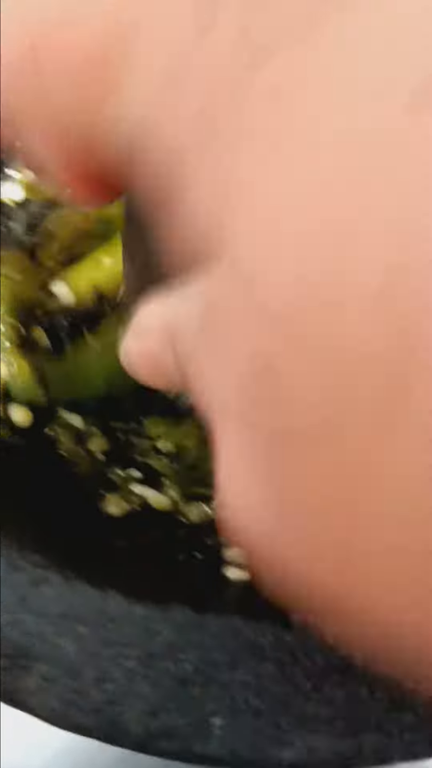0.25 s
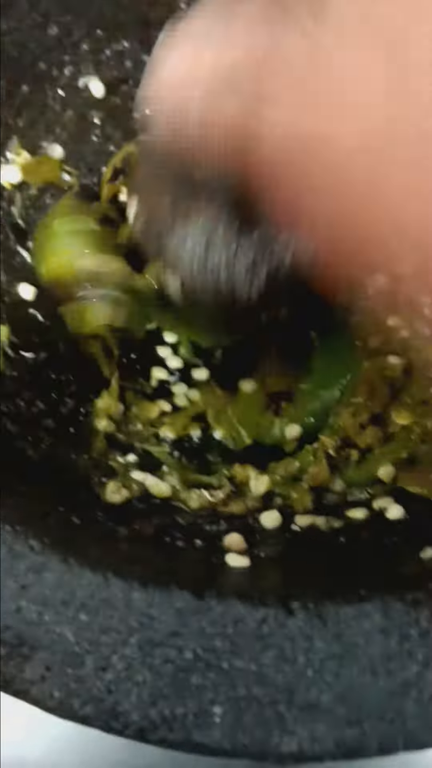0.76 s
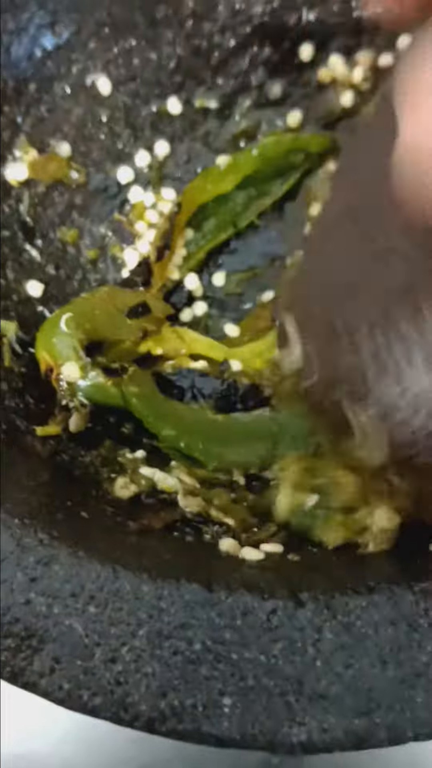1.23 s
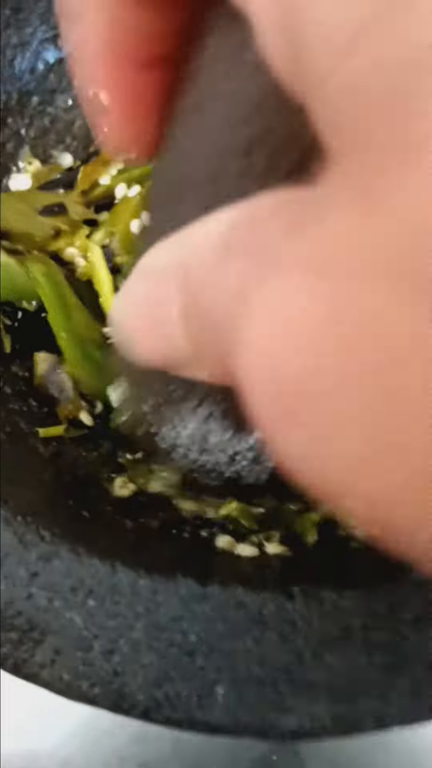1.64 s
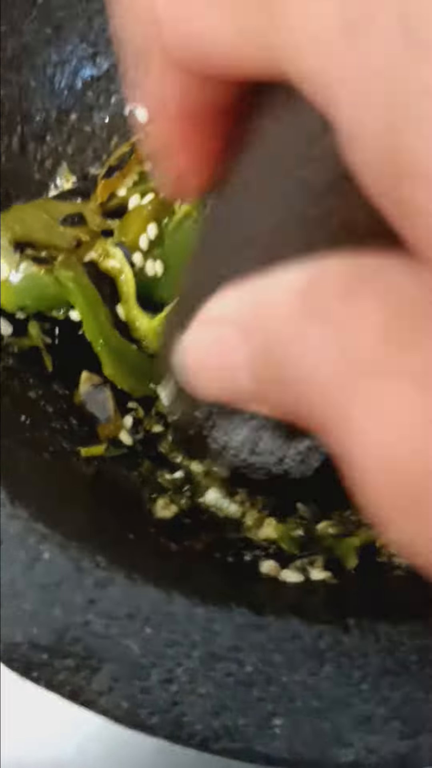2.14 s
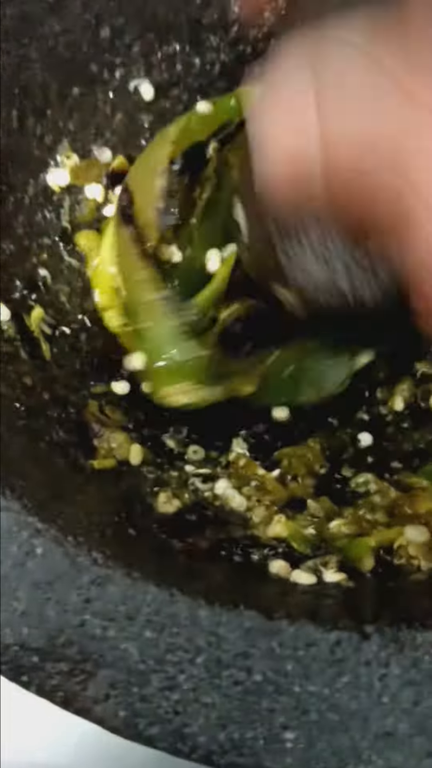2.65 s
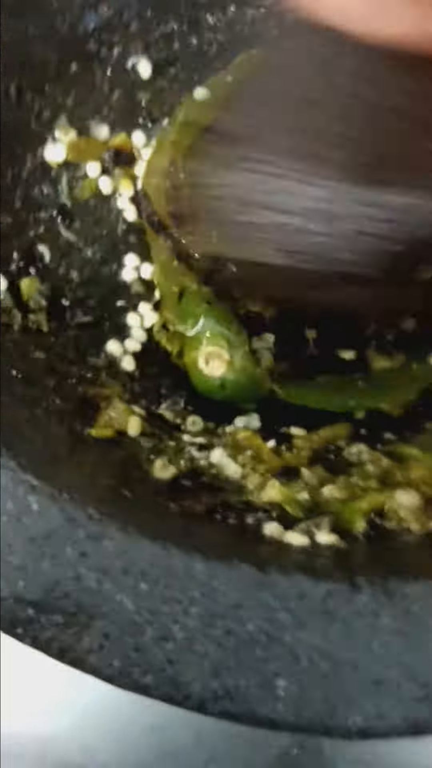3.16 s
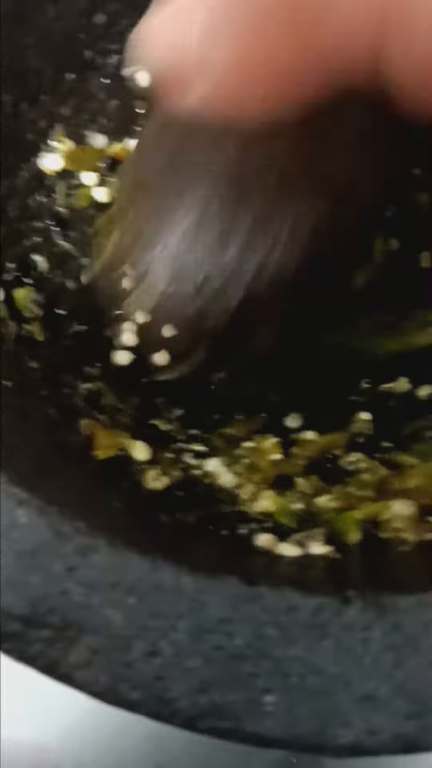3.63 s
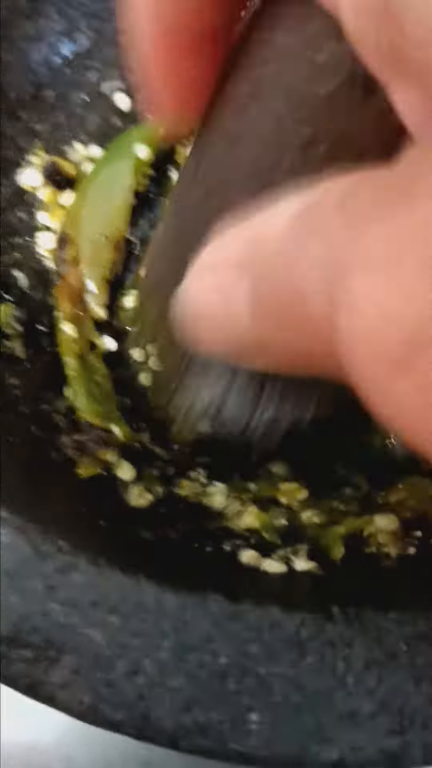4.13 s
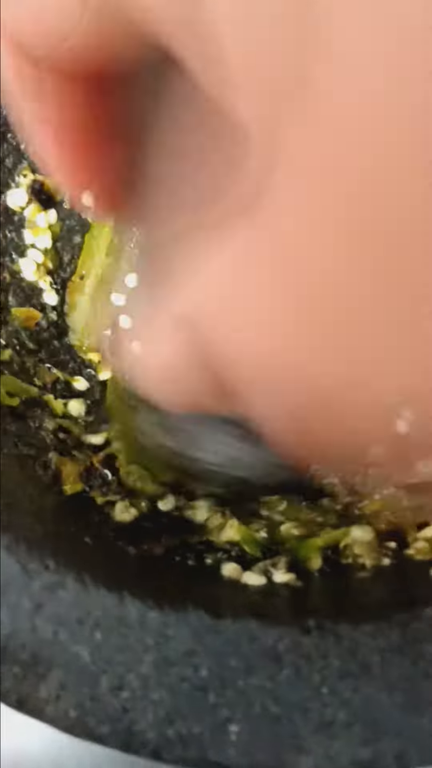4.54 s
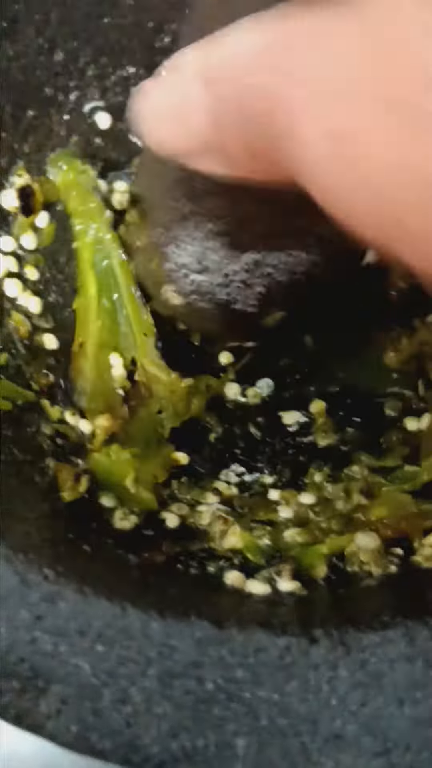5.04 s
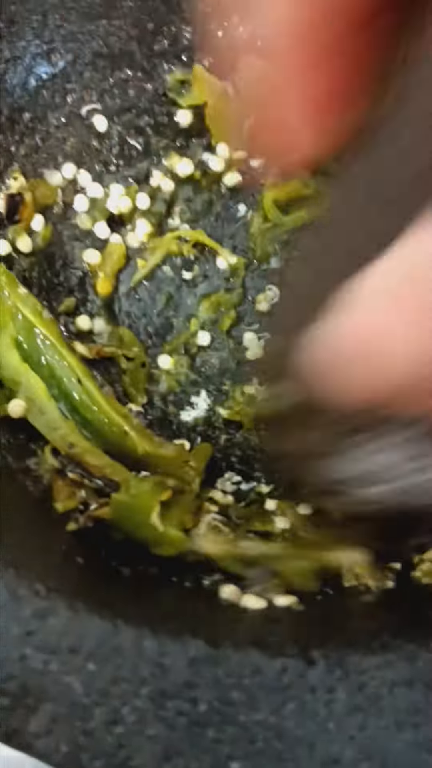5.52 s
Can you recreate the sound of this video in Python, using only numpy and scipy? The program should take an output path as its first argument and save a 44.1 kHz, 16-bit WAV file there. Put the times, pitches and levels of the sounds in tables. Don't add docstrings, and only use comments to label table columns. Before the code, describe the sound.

A stone pestle crushes green chiles in a stone mortar, with crackling seeds, gritty strokes, dull knocks and a few hard stone clacks, heard very close.

```python
import sys
import numpy as np
from scipy import signal
from scipy.fft import rfft, irfft, next_fast_len
from scipy.io import wavfile
from scipy.ndimage import uniform_filter1d

SR = 44100
rng = np.random.default_rng(int(sys.argv[2]) if len(sys.argv) > 2 else 0)


def voltage_ratio(level):
    return 10 ** (np.asarray(level, float) / 20)


def put_to_file(sound):
    columns = np.atleast_2d(sound).T
    safe = np.clip(columns, -1, 1)
    whole_steps = np.round(safe * 32767)
    wavfile.write(sys.argv[1], SR, whole_steps.astype(np.int16))


N = 254867
HZ = np.fft.rfftfreq(next_fast_len(N + 8192), 1 / SR)

# (pitch [Hz], level [dB])
WALL = [(610, 20), (715, 21.5), (950, 21.5), (1190, 12.5), (1400, 16), (1580, 7), (1780, -12), (2100, 6),
        (2400, 10.5)]
WALL_WIDTH_HZ = 110
# (pitch [Hz], level [dB])
FINE = [(1500, -87.5), (3000, -10.5), (4500, 1.5), (7000, 3.5), (11000, 5.5), (16500, -1.5)]


def evened(x):
    return x / np.sqrt(np.mean(x ** 2) + 1e-20)


def read(points, hz):
    f, value = np.transpose(points)
    return np.interp(np.log(hz + 1), np.log(f + 1), value)


def colour(x, points):
    size = 2 * (len(HZ) - 1)
    return irfft(rfft(x, size) * voltage_ratio(read(points, HZ)), size)[..., :N]


def add(mix, s, sound):
    part = mix[..., round(s * SR):][..., :sound.shape[-1]]
    part += sound[..., :part.shape[-1]]


def resonate(x, hz, width):
    hz = min(hz, SR / 2.2)
    return signal.lfilter(*signal.iirpeak(hz, hz / width, SR), x)


def mode(hz, t60, rise=0.00032, count=22050):
    t = np.arange(count) / SR
    fade = voltage_ratio(-60 * t / t60)
    return fade * (1 - np.exp(-t / rise)) * np.sin(2 * np.pi * hz * t)


def pair(shared, own):
    # (pitch [Hz], left-right likeness [0 to 1])
    likeness = [(200, 0.33), (600, 0.09), (1500, 0.21), (4000, 0.11), (15000, 0.043)]
    size = 2 * (len(HZ) - 1)
    same = np.clip(read(likeness, HZ), 0, 1)
    both = np.sqrt(same) * rfft(shared, size) + np.sqrt(1 - same) * rfft(own, size)
    return irfft(both, size)[:, :N]


def stroke(order):
    # (landing [s], lifting [s], counter rumble [dB], stone scrape [dB], grit rubbing [dB])
    hand_moves = [(0.0, -0.011, -21, -22, -42.5), (0.089, 0.065, -38, -33.5, -62),
                  (0.316, 0.29, -18, -14.5, -41), (0.665, 0.77, -43, -70.5, -61.5),
                  (1.015, 1.121, -37.5, -54, -48.5), (1.289, 1.37, -37.5, -47, -75),
                  (1.404, 1.512, -35, -39.5, -47.5), (1.522, 1.584, -34.5, -42.5, -62),
                  (1.687, 1.74, -29, -52, -64.5), (1.931, 1.954, -34, -36.5, -58),
                  (2.164, 2.205, -20, -28.5, -45.5), (2.275, 2.41, -37, -49, -56.5),
                  (2.566, 2.696, -25, -32.5, -60.5), (3.005, 3.076, -28.5, -38, -44.5),
                  (3.33, 3.482, -37, -54, -48.5), (3.51, 3.74, -37.5, -52, -51.5),
                  (3.798, 3.986, -30.5, -39.5, -51.5), (4.152, 4.266, -25, -31, -49),
                  (4.358, 4.495, -31.5, -34, -48.5), (4.56, 4.88, -32.5, -49.5, -47),
                  (4.93, 5.03, -32.5, -46, -75.5), (5.26, 5.46, -27.5, -36.5, -49.5),
                  (5.538, 5.548, -28.5, -26, -47), (5.611, 5.777, -34.5, -42.5, -47.5)]
    landing_db_per_s = (1301.5, 2497.5, 510)[order]
    lifting_db_per_s = (153, 236, 62)[order]
    rest_db = (-60, -65.5, -86.5)[order]
    t = np.arange(0, N + 64, 64) / SR
    power = voltage_ratio(2 * rest_db)
    for land, lift, *levels_db in hand_moves:
        early_db = landing_db_per_s * np.maximum(land - t, 0)
        late_db = lifting_db_per_s * np.maximum(t - lift, 0)
        power = power + voltage_ratio(2 * (levels_db[order] - (early_db + late_db)))
    return np.interp(np.arange(N) / SR, t, np.sqrt(power))


def crackle(per_s, spread_db, smear, bed):
    size_db = spread_db * np.minimum(rng.exponential(1, N), 3.8)
    fractures = voltage_ratio(size_db) * (rng.random(N) < per_s / SR)
    smeared = signal.lfilter([1], [1, -np.exp(-1 / (smear * SR))], fractures)
    noise = rng.standard_normal((3, N)) * (bed + evened(smeared))
    return pair(noise[0], noise[1:])


def patchy(x, depth_db):
    hz, t, z = signal.stft(x, SR, nperseg=256)
    field = uniform_filter1d(rng.standard_normal(z.shape[1:]), size=12, axis=0)
    field = evened(uniform_filter1d(field, size=8, axis=1))
    return signal.istft(z * voltage_ratio(depth_db * field), SR, nperseg=256)[1][:, :N]


def crushing():
    # (time [s], fine grit [dB], coarse grit against fine [dB], length [ms])
    skin_presses = [(0.344, -26, -19.5, 6.7), (3.2, -45, 4, 40), (1.064, -34, 4, 5.1), (1.127, -35, 6, 48),
                    (1.425, -34, -34.5, 31), (1.447, -26, -7.5, 27), (1.551, -31.5, -7, 26),
                    (1.6, -29.5, -19.5, 37), (1.728, -26, -25, 34), (1.844, -32.5, -24.5, 58),
                    (2.212, -24, 0, 9.8), (3.364, -25.5, -8, 33.6), (3.447, -32, -22.5, 44),
                    (3.951, -34, -10, 41), (4.033, -34, -44, 35), (4.241, -27, -20, 14),
                    (2.675, -22, -6, 22), (4.589, -24.5, -5, 1.3), (4.717, -38, 4.5, 64),
                    (4.979, -26.5, 0, 20), (5.549, -27.5, -14, 55), (5.621, -31, 4, 11),
                    (5.711, -33.5, -2, 25), (5.604, -31.5, -15, 9.2)]
    # (time [s], fine grit [dB], coarse grit against fine [dB], length [ms])
    seed_crushes = [(0.286, -26.5, 4.5, 12), (0.431, -52, 9.5, 60), (0.661, -35, -1, 31),
                    (0.744, -37.5, -9.5, 27), (1.314, -28, -24.5, 9), (1.637, -33, -15.5, 20),
                    (1.869, -29, -44.5, 7.2), (1.947, -30.5, -12.5, 25), (2.147, -19, -10, 5.2),
                    (2.175, -29.5, 2, 6.8), (2.336, -33, -1.5, 26), (2.365, -33, 7, 3.7),
                    (2.655, -25, 0, 27.7), (3.057, -29.5, 2, 42.4), (3.576, -31, 0, 75),
                    (3.751, -27.5, -10.5, 50), (3.905, -29.5, -4, 25), (4.277, -29.5, 6.5, 5.3),
                    (4.537, -31, -12, 20), (4.613, -31, -4.5, 26), (4.678, -29, -21, 10),
                    (4.821, -36, -5, 38), (5.459, -32.5, -9, 19)]
    # (time [s], fine grit [dB], coarse grit against fine [dB], length [ms])
    pulp_smears = [(0.073, -36, -8, 36), (0.317, -47, 13, 4.9), (0.693, -33, -16.5, 28),
                   (0.979, -33.5, -11, 24), (1.011, -45.5, -6.5, 190), (1.181, -35, -20, 17),
                   (1.265, -29, -9.5, 66), (1.917, -26, -26.5, 5.3), (2.415, -35, -12, 45),
                   (2.76, -41, 0, 130), (2.797, -42, 2, 6), (0.47, -44, 0, 130), (0.78, -46, -6, 120),
                   (5.04, -35, -20, 3), (5.049, -34, -20, 3), (5.075, -34, -20, 3), (2.5435, -22, 4, 9.1),
                   (2.582, -34.5, -8.5, 120), (2.738, -34, -30, 32), (2.971, -28.5, -41, 4.9),
                   (3.328, -38, -4, 21), (3.408, -48, -6, 23), (3.541, -30, -43, 15),
                   (3.869, -29.5, -17, 40), (4.1465, -25, -25.5, 9), (4.17, -35, -20, 70),
                   (1.79, -37, -25, 70), (1.96, -38, -20, 80), (5.375, -38, -8, 80), (3.1, -41, -4, 90),
                   (4.407, -28, -2.5, 37), (4.473, -39, -6, 75), (4.847, -31, -11.5, 16),
                   (5.063, -33.5, -15.5, 26), (5.2065, -33, -5, 8), (4.162, -28, -20, 14),
                   (4.222, -35, -20, 8), (4.908, -36, -5, 12), (5.035, -38, -5, 15), (0.54, -52, 6, 20),
                   (2.618, -30, -15, 12), (1.245, -42, 3, 10), (5.328, -30, -2.5, 57)]
    power = (stroke(order=2) * voltage_ratio([[11.], [-4.]])) ** 2
    padded = np.pad(power, ((0, 0), (4000, 6000)))
    ms = np.arange(-4000, 6000) * 1000 / SR
    bend = np.where(ms < 0, 2.2, 1.3)
    for bursts, swell in ((skin_presses, 0.84), (seed_crushes, 0.47), (pulp_smears, 0.25)):
        for s, db, coarse_db, length_ms in bursts:
            swell_ms = max(swell * length_ms, .7)
            fade_ms = max((1 - swell) * length_ms, .7)
            slope = np.where(ms < 0, -ms / swell_ms, ms / fade_ms)
            shape = voltage_ratio(-7. * slope ** bend)
            add(padded, s, voltage_ratio([[db], [db + coarse_db]]) ** 2 * shape ** 2)
    return np.sqrt(padded[:, 4000:4000 + N])


def grit():
    # (pitch [Hz], level [dB])
    coarse_colour = [(500, -30), (1000, -13.5), (2000, -5.5), (3400, -1), (5000, -9.5), (8000, -8)]
    fine = evened(patchy(colour(crackle(1300., 3.4, .0005, .7), FINE), 1.4))
    coarse = evened(patchy(colour(crackle(300., 3.5, .0015, .6), coarse_colour), 2.8))
    fine_gain, coarse_gain = crushing()
    return voltage_ratio(3.0) * fine_gain * fine + voltage_ratio(3.82) * coarse_gain * coarse


def snaps():
    # (time [s], peak level [dB])
    seed_cracks = [(0.2845, -7), (0.3405, -3.5), (0.0218, -18), (0.404, -26), (0.43, -25), (0.509, -26),
                   (0.531, -28), (0.551, -26), (0.9737, -22), (1.05, -24), (1.1255, -14), (1.1785, -20),
                   (1.2648, -13), (1.298, -13), (0.656, -10), (0.694, -13.5), (1.0653, -10), (1.3148, -4),
                   (1.4222, -4.5), (1.4415, -7), (1.4472, -5), (1.712, -16), (1.9145, -18), (1.943, -12),
                   (2.127, -18), (2.3503, -7), (2.617, -13), (2.661, -8), (3.033, -12), (3.319, -16),
                   (3.344, -13), (3.7375, -14), (1.6903, -4), (1.786, -20), (1.803, -22), (1.728, -12),
                   (2.1986, -11.5), (2.2084, -1), (2.362, -4), (2.5442, -23), (3.3642, -7), (3.5407, -8),
                   (4.2396, -11), (4.586, -12.5), (4.1615, -12), (4.2205, -16), (4.273, -13), (4.4005, -14),
                   (4.5725, -21), (4.6505, -16), (4.661, -15), (4.7143, -12), (4.8165, -17), (4.8467, -15),
                   (4.9073, -22), (4.9562, -15), (5.454, -17), (5.5475, -8), (4.6756, -2.5), (5.309, -8.5),
                   (5.3262, -14)]
    out = np.zeros((3, N))
    t = np.arange(600) / SR
    shape = (1 - np.exp(-t / 0.0001)) * np.exp(-t / 0.0006)
    for s, db in seed_cracks:
        burst = rng.standard_normal((3, 600)) * shape
        add(out, s, voltage_ratio(db + 1.5) * burst / abs(burst).max(axis=1, keepdims=True))
    return colour(pair(out[0], out[1:]), FINE)


def knocks():
    # (time [s], peak level [dB], centre of the knock [Hz])
    stone_hits = [(0.0925, -11, 740), (0.316, -25.5, 700), (0.648, -26, 2300), (0.633, -35, 1810),
                  (1.097, -28, 2150), (2.656, -17, 2390), (4.972, -23, 1690), (5.617, -20, 1070),
                  (0.665, -30, 1600), (1.407, -16, 957), (1.453, -22.5, 744), (1.554, -16.5, 930),
                  (1.654, -16, 750), (1.69, -12.5, 760), (1.707, -11.5, 1150), (1.712, -9, 750),
                  (1.833, -20, 985), (1.908, -10, 963), (2.174, -16.5, 1285), (2.573, -26, 665),
                  (2.624, -18.5, 1000), (2.675, -14.5, 703), (2.682, -17.5, 1390), (1.72, -16, 800),
                  (1.945, -22, 1100), (1.96, -24, 900), (3.947, -26, 692), (4.145, -7, 720),
                  (4.2203, -6.5, 1646), (4.2755, -5.5, 1500), (4.398, -16.5, 1750), (4.44, -15.5, 944),
                  (4.479, -28, 828), (4.717, -21.5, 740), (5.205, -8, 1610), (5.2915, -16.5, 1024),
                  (5.357, -21.5, 734), (5.544, -0.5, 1570), (5.624, -12.5, 953)]
    out = np.zeros((2, N))
    t = np.arange(3000) / SR
    fade = np.exp(-t / .0035) + .15 * np.exp(-t / .018)
    for s, db, centre_hz in stone_hits:
        noise = rng.standard_normal((3, 3000))
        rattle = (.6 * noise[0] + .8 * noise[1:]) * fade
        wall = 0
        for hz, mode_db in WALL:
            far_db = 6. * abs(np.log2(hz / centre_hz))
            wall = wall + voltage_ratio(mode_db - far_db) * resonate(rattle, hz, WALL_WIDTH_HZ)
        wall = resonate(wall, centre_hz, 0.98 * centre_hz)
        pulse = mode(centre_hz, 0.005, rise=0.0003, count=3000)
        add(out, s, voltage_ratio(db) * (2.24 * pulse + 0.92 * wall / abs(wall).max()))
    return out


def pestle():
    # (time [s], peak level [dB])
    bare_hits = [
        (4.1454, -6.5),
        (4.2205, -20),
        (4.2744, -17),
        (5.2056, -7),
        (5.5463, -45),
    ]
    # (pitch [Hz], level [dB], time to fade by 60 dB [s])
    pestle_tones = [(2630, -23, .1), (2735, -19, .33), (2150, -12, .05), (3030, -21, .22), (2760, -3, .035),
                    (3100, -11, .04), (1900, -18, .1), (1580, -16, .08)]
    out = np.zeros((2, N))
    t = np.arange(6000) / SR
    crack_fade = np.exp(-t / 0.0016) + 0.2 * np.exp(-t / .035)
    band = signal.butter(6, (250, 3200), "band", fs=SR, output="sos")
    for s, db in bare_hits:
        for hz, mode_db, t60 in pestle_tones:
            detune, *ears = rng.uniform(-0.34, 1, 3)
            ear_db = db + mode_db + 3. * np.array(ears)[:, None]
            add(out, s, voltage_ratio(ear_db) * mode(hz * (1 + .006 * detune), t60, rise=.0003))
        noise = rng.standard_normal((3, 6000))
        crack = (noise[0] + 0.54 * noise[1:]) * crack_fade
        add(out, s, voltage_ratio(.6 * db - 4.) * signal.sosfilt(band, crack))
    chatter = evened(uniform_filter1d(rng.standard_normal((2, N)), size=160))
    return out * voltage_ratio(3.5 * chatter)


def scrape():
    rub = crackle(200., 1.0, 0.013, 0.73)
    wall = sum(voltage_ratio(db) * resonate(rub, hz, 2 * WALL_WIDTH_HZ) for hz, db in WALL)
    return voltage_ratio(-5.0) * stroke(order=1) * evened(wall)


def squeaks():
    # (time [s], length [s], level [dB])
    skin_drags = [
        (3.649, 0.1, -48.5),
        (4.68, 0.33, -51.5),
    ]
    hz, width_hz = 2090, 130
    out = np.zeros(N)
    for s, length, db in skin_drags:
        noise = resonate(rng.standard_normal(SR // 2), hz, width_hz)
        noise = resonate(noise, hz, 2 * width_hz)
        count = round(length * SR)
        add(out, s, voltage_ratio(db) * np.sqrt(np.hanning(count)) * evened(noise)[:count])
    return out


def bowl():
    # (time [s], low tone [dB], upper tone [dB])
    soft_pushes = [(0.0, -32, -17.5), (0.314, -20, -15.5), (0.35, -33, -40), (0.447, -35.5, -41),
                   (0.585, -44, -54.5), (2.451, -43, -54.5), (1.408, -31, -26), (1.554, -43, -35.5),
                   (1.689, -25.5, -57), (1.832, -39, -35.5), (1.908, -37.5, -18.5), (1.955, -39.5, -19.5),
                   (2.172, -19.5, -14), (2.247, -31.5, -21), (2.573, -23.5, -20.5), (3.006, -27.5, -18.5),
                   (3.042, -24, -29), (3.11, -36, -36), (3.325, -42, -50), (3.43, -47, -54),
                   (3.545, -42, -42), (3.8, -27, -23.5), (3.95, -34.5, -18.0), (4.218, -23, -20.5),
                   (4.274, -30, -23.5), (4.343, -32, -20.5), (4.441, -49, -20), (5.291, -29, -31),
                   (5.428, -34, -23), (5.542, -46, -34.5)]
    # (pitch [Hz], time to fade by 60 dB [s])
    bowl_tones = [(438, .32), (528, .14)]
    hum_width_hz = 30
    out = np.zeros(N)
    for s, *levels_db in soft_pushes:
        for db, (hz, t60) in zip(levels_db, bowl_tones):
            load = .015 * rng.uniform(-1.25, 1)
            add(out, s, voltage_ratio(db) * mode(hz * (1 + load), t60, rise=.0015))
        add(out, s, voltage_ratio(levels_db[1] - 3.0) * mode(600.0, 0.014, rise=0.0022, count=3000))
    rub = rng.standard_normal(N) * stroke(order=0)
    for hz, t60 in bowl_tones:
        hum = resonate(resonate(rub, hz, hum_width_hz), hz, 3 * hum_width_hz)
        out += voltage_ratio(0.1) * hum
    wobble = evened(uniform_filter1d(rng.standard_normal(N), 500))
    return out * voltage_ratio(2.5 * wobble)


def counter():
    # (time [s], peak level [dB], pitch [Hz])
    counter_blows = [(0.281, -16, 96.6), (0.994, -28, 81.6), (1.411, -24, 130), (1.902, -18, 90),
                     (2.162, -23, 79), (2.561, -15.5, 78.3), (2.658, -31, 100.3), (2.966, -21, 85),
                     (3.038, -17, 83.3), (5.43, -19, 125), (5.612, -23, 125), (3.791, -23, 82),
                     (3.94, -28, 114), (4.145, -8, 130.5), (4.224, -15.5, 132.7), (4.279, -15, 128),
                     (4.412, -15.5, 80.6), (4.702, -14.5, 86.4), (5.207, -14.5, 147.4),
                     (5.539, -15.5, 138.7)]
    # (pitch [Hz], width [Hz], level [dB])
    counter_tones = [(68.3, 35.6, 14.5), (86.5, 16, 9.5), (96.2, 46, 12), (121.3, 22, 6.5), (151.3, 8.1, 4),
                     (222, 21, -27.5)]
    lumps = evened(uniform_filter1d(rng.standard_normal(N), 900))
    force = rng.standard_normal(N) * voltage_ratio(2.4 * lumps)
    rumble = np.zeros(N)
    for hz, width, db in counter_tones:
        rumble += voltage_ratio(db) * resonate(resonate(force, hz, width), hz, 3 * width)
    out = voltage_ratio(-7.0) * stroke(order=0) * evened(rumble)
    for s, db, hz in counter_blows:
        add(out, s, voltage_ratio(db - 7.0) * mode(hz, 0.16, rise=0.0057))
    return out


def kitchen(x):
    # (pitch [Hz], time to fade by 60 dB [s])
    echo_fades = [(200, 0.99), (1000, 0.29), (4000, 0.56), (12000, 0.43)]
    taps = np.zeros((2, SR // 2))
    at = np.arange(200, SR // 2 - 20, 20)
    at = at + rng.integers(0, 20, (2, len(at)))
    np.put_along_axis(taps, at, rng.choice([-1., 1.], at.shape), 1)
    hz, t, z = signal.stft(taps, SR, nperseg=256)
    fade = voltage_ratio(-60 * t / read(echo_fades, hz)[:, None])
    tail = signal.istft(z * fade, SR, nperseg=256)[1]
    return signal.fftconvolve(x, tail / np.linalg.norm(tail[0]), axes=1)[:, :N]


def hiss():
    # (pitch [Hz], level [dB])
    hiss_colour = [(30, -12), (60, -5), (120, -24.5), (5500, -22.5), (8300, 5), (10500, 7), (16500, -6.5)]
    noise = rng.standard_normal((3, N))
    return voltage_ratio(-45.5) * evened(colour(pair(noise[0], noise[1:]), hiss_colour))


def scene():
    treble = grit() + snaps()
    blows = knocks() + pestle() + scrape() + squeaks()
    ring, low = bowl(), counter()
    left_low = np.roll(low, -11) + np.roll(ring, -4)
    bass = np.array([left_low, low + ring])
    echoes = voltage_ratio(-7.5) * kitchen(treble) + voltage_ratio(-9.0) * kitchen(blows)
    return treble + blows + echoes + bass + hiss()


def hushed(x, edge_db, depth_db):
    hz, t, z = signal.stft(x, SR, nperseg=512)
    power = uniform_filter1d(abs(z) ** 2, size=3, axis=1)
    power = uniform_filter1d(power, size=3, axis=2)
    level_db = 10 * np.log10(power + 1e-14)
    over_db = level_db - np.percentile(level_db, 10, axis=2, keepdims=True)
    cut_db = depth_db * np.clip(2.0 - over_db / edge_db, 0, 1)
    return signal.istft(z * voltage_ratio(-cut_db), SR, nperseg=512)[1][:, :N]


def top_cut(x):
    return signal.sosfilt(signal.butter(12, 16520, fs=SR, output="sos"), x)


def record(dry):
    # (pitch [Hz], level [dB])
    left_colour = [(200, 9), (450, 8), (800, -1), (2200, -4), (8500, 2), (10000, -3.5), (12000, -19.5),
                   (16000, -25.5)]
    # (pitch [Hz], level [dB])
    right_colour = [(200, 10), (450, 5.5), (800, 0), (5000, 2.5), (8000, 1), (10000, 10), (12000, -4),
                    (15500, -9.5)]
    left = np.concatenate([np.zeros(49), colour(dry[0], left_colour)])[:N]
    right = colour(dry[1], right_colour)
    both = hushed(np.array([left, right]), edge_db=9.0, depth_db=10.)
    both = signal.oaconvolve(both, signal.firwin(255, 15900, fs=SR)[None], "same")
    both = signal.lfilter(*signal.butter(2, 28., "high", fs=SR), both)
    return top_cut(np.clip(both, -1, 1))


dry = scene()
out = record(dry)
put_to_file(out)
```